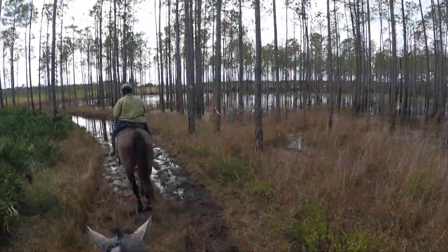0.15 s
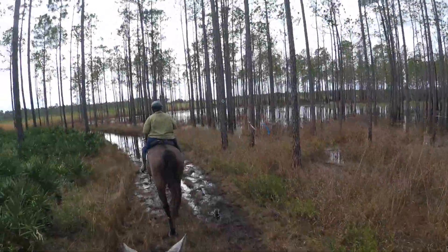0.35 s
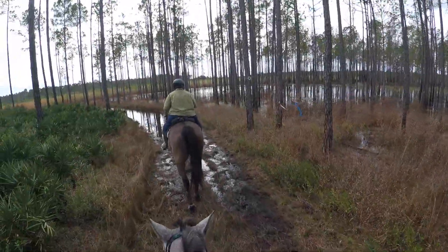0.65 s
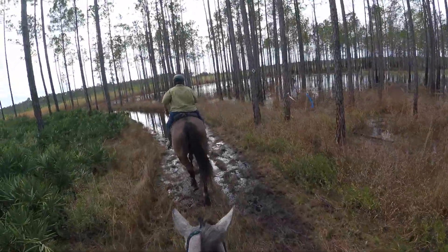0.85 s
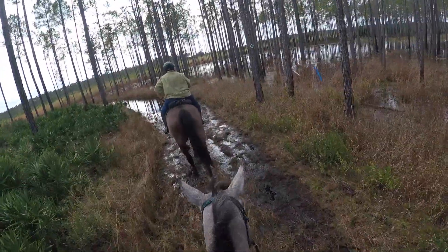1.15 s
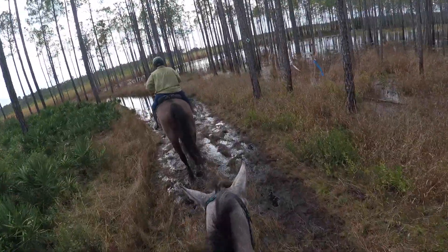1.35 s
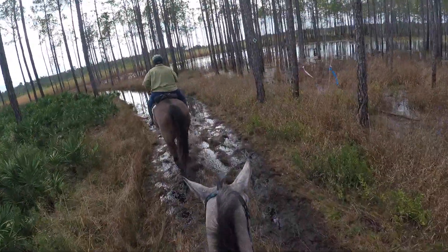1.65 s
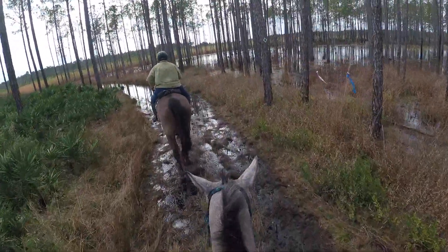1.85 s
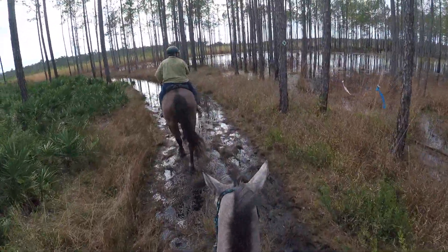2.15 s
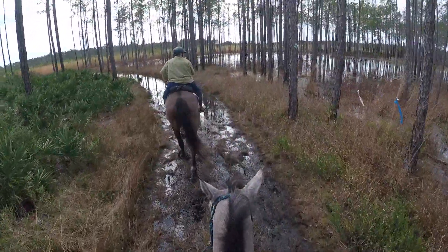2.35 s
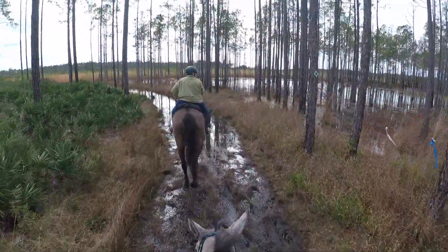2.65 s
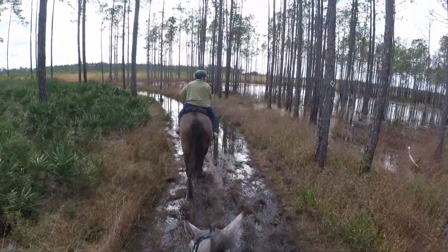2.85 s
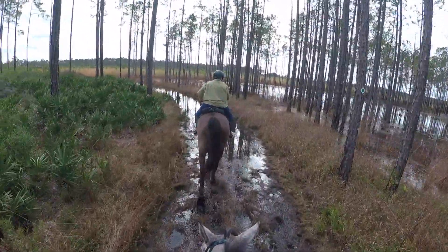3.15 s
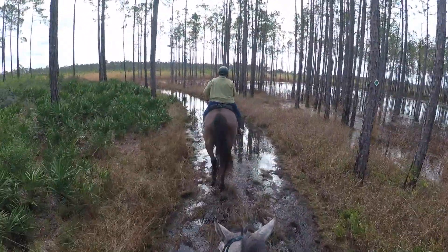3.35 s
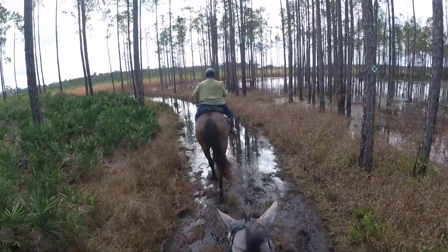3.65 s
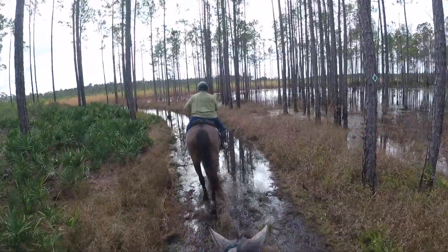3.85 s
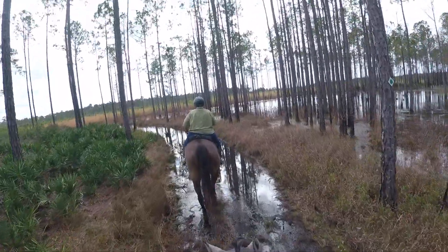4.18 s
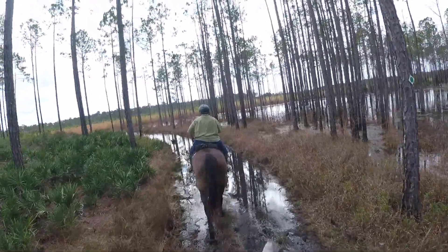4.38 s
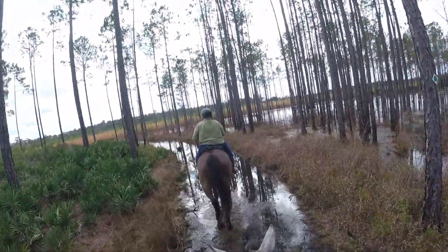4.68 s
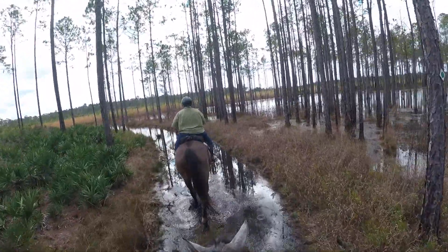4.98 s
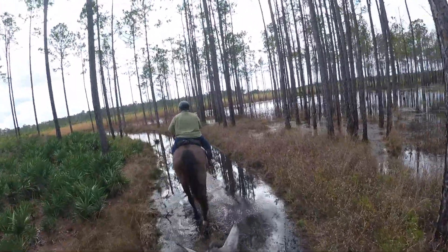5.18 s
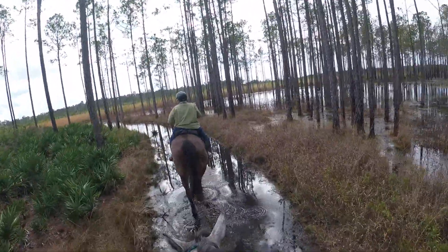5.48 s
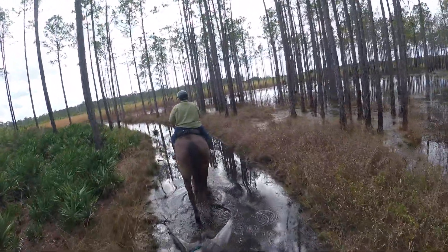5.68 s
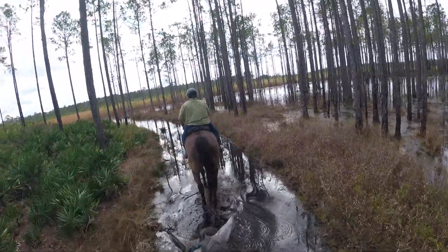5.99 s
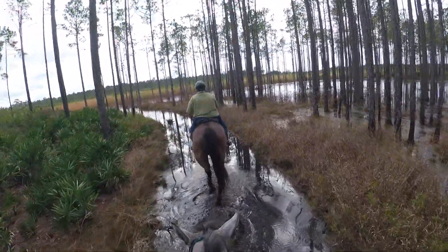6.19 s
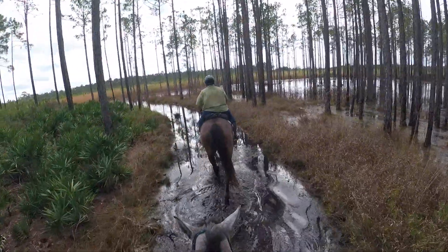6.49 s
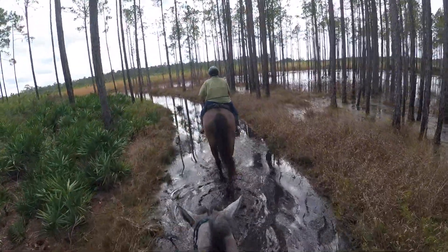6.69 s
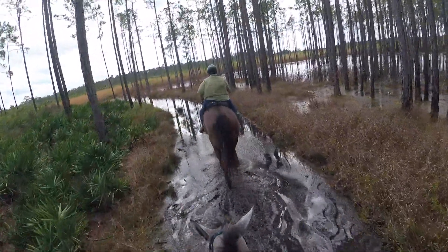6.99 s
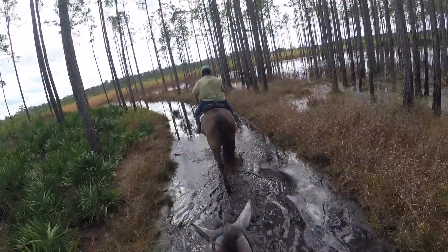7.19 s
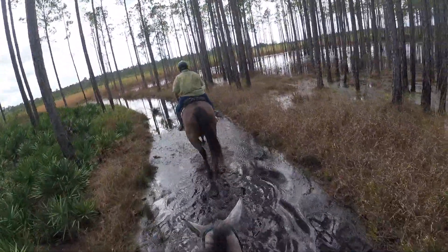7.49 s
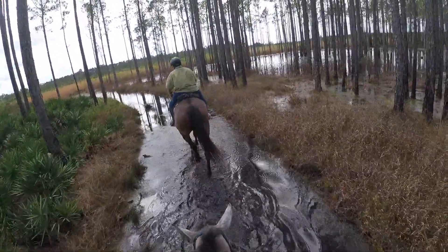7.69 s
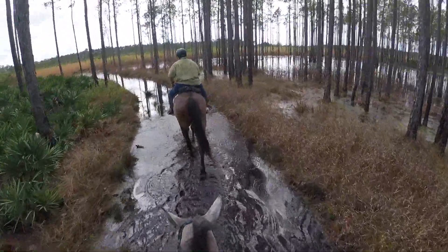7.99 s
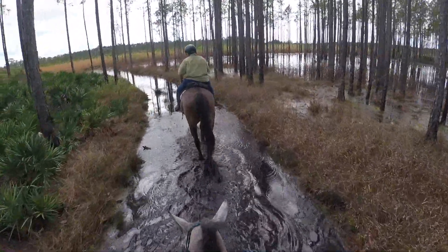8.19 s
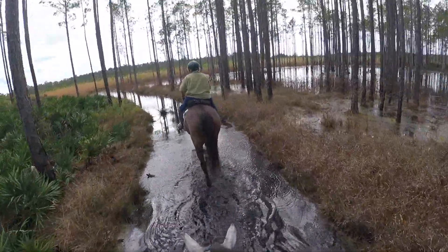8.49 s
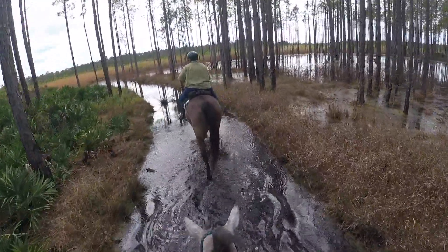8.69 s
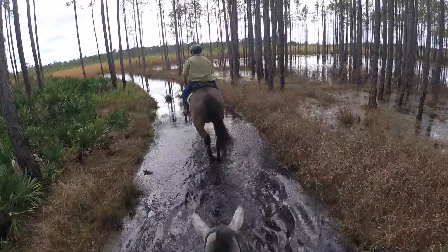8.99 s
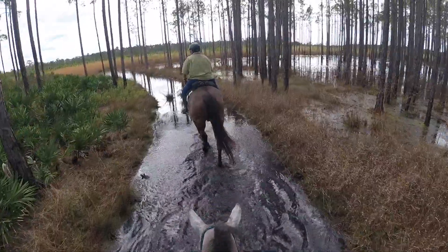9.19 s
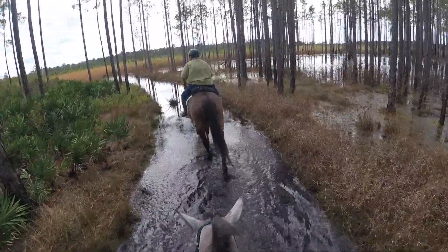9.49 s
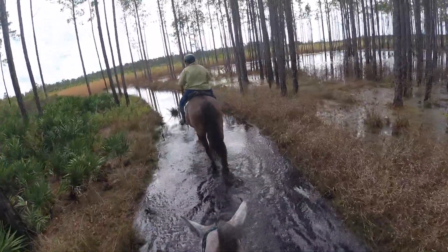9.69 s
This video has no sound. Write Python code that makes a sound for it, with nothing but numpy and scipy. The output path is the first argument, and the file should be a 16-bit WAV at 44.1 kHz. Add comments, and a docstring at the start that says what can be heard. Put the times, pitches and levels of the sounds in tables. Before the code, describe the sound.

Two horses walk along a muddy woodland trail, heard close from the second saddle. Wind rumbles and puffs against the microphone over faint hiss. Hooves slap and squelch irregularly in mud, with a hard knock early on. Around the middle the ground turns wetter: gurgling, hollow plops, spray and bright drops increase. Two more knocks come near the end.

```python
"""Two horses walk along a muddy forest trail that turns into shallow water, heard from the saddle of the second.
From the start wind (rumbling noise with single swings and puffs) buffets the microphone over a faint hiss.
Hooves slap (ragged noise bursts) and squelch (crowds of ringing bubbles on noise); air pockets plop as gliding tones.
At 2.6 s something hard knocks (a rattle in damped modes). From about 5 s the trail gets wetter: spray grows and
bright flicks of drops join in. Two more knocks come at 9.1 and 9.7 s."""
import sys
import numpy as np
from scipy import signal
from scipy.fft import rfft, irfft
from scipy.io import wavfile

SR = 44100
rng = np.random.default_rng(int(sys.argv[2]) if len(sys.argv) > 2 else 0)


def generate_wav(signal):
    """Clip the signal to [-1, 1] and save it as 16-bit WAV at the path in sys.argv[1]."""
    frames = np.transpose(np.atleast_2d(signal))
    scaled = np.clip(frames, -1, 1) * 32767
    pcm = np.round(scaled).astype(np.int16)
    wavfile.write(sys.argv[1], SR, pcm)


def decibels_to_gain(level_db):
    """Convert a level in decibels to a linear amplitude gain (20 dB per decade)."""
    exponent = np.asarray(level_db, float) / 20
    return 10 ** exponent


N = 433944   # length in samples


def rms_one(x):
    """Scale to an rms (average strength) of 1."""
    return x / np.sqrt(np.mean(x ** 2) + 1e-20)


def in_time(rows):
    """Turn rows of (seconds, values ..) into curves of straight lines, one value per sample."""
    s, *columns = np.transpose(rows)
    return [np.interp(np.arange(N) / SR, s, column) for column in columns]


def at_hz(points, hz):
    """Read a spectrum's level in dB at a frequency, along a logarithmic pitch axis."""
    table_hz, table_db = np.transpose(points)
    return np.interp(np.log(hz), np.log(table_hz), table_db)


def coloured(spectrum, low_hz, high_hz):
    """Noise shaped to a spectrum between two steep edges; rms 1."""
    hz = np.arange(N // 2 + 1) * SR / N + 1   # the 1 avoids the logarithm of zero
    edges = 1 / np.sqrt((1 + (low_hz / hz) ** 8) * (1 + (hz / high_hz) ** 8))
    white = rfft(rng.standard_normal(N))
    return rms_one(irfft(white * decibels_to_gain(at_hz(spectrum, hz)) * edges, N))


def drift(rate_hz):
    """Random wandering of rms 1: noise smoothed twice by a one-pole low-pass."""
    every = 40   # computed once in so many samples
    r = np.exp(-2 * np.pi * rate_hz * every / SR)
    noise = rng.standard_normal(N // every + 2002)
    slow = signal.lfilter([1], [1, -2 * r, r * r], noise)[2000:]   # skip the filter's start
    return np.interp(np.arange(N) / every, np.arange(len(slow)), rms_one(slow))


def add(out, s, sound):
    """Mix a short sound in at time s."""
    i = int(s * SR)
    out[i:i + len(sound)] += sound[:N - i]


def bursts(starts, t60s, rise_s):
    """Loudness outline of sudden sounds given as (s, dB); each falls 60 dB in its t60, kept to 0.01-0.3 s."""
    out, t = np.zeros(N), np.arange(SR // 4) / SR
    for (s, level_db), t60 in zip(starts, t60s):
        fall_db = -60 * t / np.clip(t60, .01, .3)
        add(out, s, (1 - np.exp(-t / rise_s)) * decibels_to_gain(level_db + fall_db))
    return out


def bubble(hz, cycles, rise, onset_cycles=0.1):
    """An air pocket rings; its pitch glides (octaves per s) and it fades 40 dB in so many of its own cycles."""
    t = np.arange(int(cycles / hz * SR)) / SR   # cut after as many cycles of the first pitch
    pitch = np.minimum(hz * 2 ** (rise * t), SR / 2.5)
    turns = np.cumsum(pitch) / SR
    return (1 - np.exp(-turns / onset_cycles)) * decibels_to_gain(-40 * turns / cycles) * np.sin(2 * np.pi * turns)


# Colour of the hiss. Each row: frequency in Hz, relative level in dB.
HISS_SPECTRUM = [(180, -4), (300, 1.5), (1020, -5.5), (1510, -14.5), (2130, -15), (3610, -19),
                 (4630, -27.5), (7590, -17.5), (12400, -27.5), (15400, -31.5)]


def hiss():
    """A faint steady noise, made by shaping white noise to a fixed spectrum."""
    return decibels_to_gain(-73.5) * coloured(HISS_SPECTRUM, 170, 16000)


# Strength of the wind on the microphone.
# Each row: time in seconds, deep buffeting in dB, small eddies relative to it in dB.
WIND_STRENGTH = [(0.0, -58, -7), (0.05, -44.5, -1.5), (1.29, -43.5, -0.5), (2.27, -54.5, -15),
                 (2.63, -43, -3.5), (2.82, -49.5, -12), (3.37, -43.5, -1.5), (3.51, -58.5, -8),
                 (3.94, -47, -2.5), (4.9, -50.5, -1.5), (5.12, -35.5, -5), (5.31, -49.5, -12.5),
                 (5.45, -43, -5.5), (5.84, -52.5, -8.5), (6.9, -50, -16.5), (6.99, -33.5, -15),
                 (7.04, -43.5, -9.5), (8.06, -40, -11.5), (8.44, -32, -8.5), (8.71, -39, -5.5),
                 (9.26, -36.5, -7.5), (9.29, -47.5, -6), (9.81, -34, -10.5), (9.84, -41, -15)]
# Single puffs of air. Each row: crest in seconds, level in dB, half width in seconds.
AIR_PUFFS = [(.13, -35.5, 0.019), (0.229, -41, 0.0041), (0.866, -45, 0.0088), (0.92, -39, 0.0037),
             (1.204, -38, 0.015), (1.363, -36, 0.013), (1.616, -44, 0.018), (3.626, -41.5, 0.0035),
             (6.412, -48, 0.0064), (6.97, -39.5, 0.0036), (7.34, -40.5, 0.0059), (7.94, -43.5, 0.0063),
             (8.375, -41.5, 0.0082), (8.428, -44, 0.0069)]
# Strong lumps in the buffeting. Each row: middle in seconds, relative level in dB, pitch in Hz.
WIND_LUMPS = [(0.116, -27.5, 80.6), (0.286, -24.5, 107), (0.348, -28, 106), (0.853, -25, 137),
              (0.918, -24, 113), (1.213, -32, 168), (1.247, -28, 121), (1.275, -29, 113),
              (1.625, -31.5, 166), (2.538, -32, 87), (5.009, -29, 100), (5.113, -24, 102), (6.99, -28, 81),
              (7.05, -30, 65), (7.261, -26, 83), (7.348, -25.5, 76), (7.938, -27, 104), (8.094, -27.5, 104),
              (8.374, -26, 89), (8.426, -26, 78), (8.52, -26, 70.5), (9.166, -29, 109), (9.203, -27.5, 92),
              (9.472, -29, 89), (9.624, -28, 93)]
# Colour of the turbulence. Each row: frequency in Hz, relative level per Hz in dB.
EDDY_SPECTRUM = [(11, -43), (18, -2), (48, 1), (89, -3), (154, -10.5), (420, -34), (550, -52), (920, -120)]


def wind():
    """Turbulence at the microphone comes in lumps; small eddies are higher and more fitful; some hit as puffs."""
    lump_cycles = 0.33   # half width of a lump: about one swing of pressure
    deep_db, small_db = in_time(WIND_STRENGTH)
    shared = drift(10.9)   # both sizes of eddy follow it
    deep = coloured(EDDY_SPECTRUM, 27, 100.5) * decibels_to_gain(3.34 * shared + 1.2 * drift(14.0))
    small = coloured(EDDY_SPECTRUM, 103.7, 287) * decibels_to_gain(2.36 * shared + 2.63 * drift(24))
    buffeting = decibels_to_gain(deep_db) * (rms_one(deep) + decibels_to_gain(small_db) * rms_one(small))
    puffs, lumps, t = np.zeros(N), np.zeros(N), np.arange(-SR // 20, SR // 20) / SR
    for s, level_db, width_s in AIR_PUFFS:
        add(puffs, s + t[0], decibels_to_gain(level_db) * np.exp(-(t / width_s) ** 2))
    for s, level_db, hz in WIND_LUMPS:
        outline = np.exp(-(t * hz / lump_cycles) ** 2 / 2)
        add(lumps, s + t[0], decibels_to_gain(level_db - 1.5) * outline * np.sin(2 * np.pi * hz * t))
    return buffeting + lumps + puffs * coloured(EDDY_SPECTRUM, 222, 600)


# Hard knocks, as of hoof on hoof or tack. Each row: start in seconds, peak in dB, rattle length in seconds,
# brightness in dB per octave above 2000 Hz, pitch of the main ring in Hz.
HARD_KNOCKS = [(2.603, -37, 0.0067, 1, 1620), (9.0856, -33, 0.011, 0.5, 1803),
               (9.7095, -31, 0.0089, -2, 1934)]
# What else rings in a knock. Each row: pitch in Hz, level in dB, time to fall 60 dB in seconds.
KNOCK_MODES = [(970, -6, .012), (1450, -3, .010), (2150, -5, .006), (2750, -8, .006), (3700, -10, .004),
               (5050, -5, .006), (7000, -12, .004)]


def knocks():
    """A rattle of a few ms strikes the heavily damped modes of a hard body; each gets its share of the blow."""
    main_ring_db = 1
    out, t = np.zeros(N), np.arange(SR // 10) / SR
    soft_contact = signal.butter(4, 7500, fs=SR, output="sos")   # takes off the highest treble
    for s, peak_db, rattle_s, bright_db, ring_hz in HARD_KNOCKS:
        outline = np.exp(-(t / rattle_s) ** 2)
        rattle = signal.sosfilt(soft_contact, rng.standard_normal(len(t))) * outline
        # the main ring lasts as long as the rattle
        main_ring = t / (t + .002) * outline * np.sin(2 * np.pi * ring_hz * t)
        knock = decibels_to_gain(main_ring_db) * rms_one(main_ring)
        for hz, level_db, t60 in KNOCK_MODES:
            ring = decibels_to_gain(-60 * t / t60) * np.sin(2 * np.pi * hz * t)
            mode = rms_one(signal.fftconvolve(rattle, ring)[:len(t)])
            knock = knock + decibels_to_gain(level_db + bright_db * max(np.log2(hz / 2000), 0)) * mode
        add(out, s, decibels_to_gain(peak_db) * knock / np.abs(knock).max())
    return out


# Bright flicks of thrown drops. Each row: start in seconds, level in dB.
DROP_FLICKS = [(5.704, -51.5), (6.6942, -53), (6.8305, -49.5), (7.418, -54), (7.4954, -52.5), (8.5041, -49),
               (9.3265, -45.5), (9.5203, -51.5)]


def flicks():
    """A handful of drops lands at once: a short bright tick of noise."""
    t60_s = 0.021
    return bursts(DROP_FLICKS, [t60_s] * len(DROP_FLICKS), 0.00091) * coloured(SPLASH_SPECTRUM, 4250, 11000)


def patter(stir_db):
    """Lumps of mud and water fall back: random dull heavy and crisp light ticks, stronger in stirred water."""
    per_s, level_db, t60_s = 70, 2.5, 0.026   # ticks of both kinds; level over the squelch; fall of a heavy one
    when, size = rng.random((int(per_s * N / SR), 2)).T
    starts = list(zip(when * (N - 1) / SR, -3.5 * np.log(1.01 - size)))   # a few ticks are much stronger
    heavy = bursts(starts[::2], [t60_s] * len(when), 0.00086) * coloured(SPLASH_SPECTRUM, 500, 1500)
    light = bursts(starts[1::2], [t60_s / 2] * len(when), 0.00091) * coloured(SMACK_SPECTRUM, 1100, 3900)
    return decibels_to_gain(stir_db + level_db) * (heavy + light)


# Colour of splashing water. Each row: frequency in Hz, relative level in dB.
SPLASH_SPECTRUM = [(240, 3), (534, -3.5), (964, -1), (1140, -4.5), (1970, -10.5), (2430, -12), (3700, -17),
                   (4700, -21), (6200, -24), (7000, -34.5), (8960, -42.5), (10700, -38), (11900, -57),
                   (15000, -60)]


def swarm(count, low_hz, high_hz, cycles, climb, spread_db):
    """Many bubbles at random moments, of random pitch, unequal level and ring; rms 1. climb: octaves in cycles."""
    out = np.zeros(N)
    for when, pitch, size, life in rng.random((count, 4)):
        hz = low_hz * (high_hz / low_hz) ** pitch
        size_db = -spread_db * np.log(1.015 - size)
        # higher bubbles are shorter, so the square root of pitch makes up for their length
        gain = decibels_to_gain(at_hz(SPLASH_SPECTRUM, hz) + size_db) * np.sqrt(hz)
        add(out, when * (N - 1) / SR, gain * bubble(hz, cycles * (0.79 + life), climb * hz / cycles))
    return rms_one(out)


def water(stir_db, low_hz, high_hz, count, cycles, climb, bubbles_db, wash_db, flicker_db, flicker_rate):
    """One size class of stirred water: a crowd of bubbles on a ragged wash of noise."""
    bubbles = swarm(count, low_hz, high_hz, cycles, climb, spread_db=1.0)
    wash = coloured(SPLASH_SPECTRUM, low_hz, high_hz) * decibels_to_gain(flicker_db * drift(flicker_rate))
    return decibels_to_gain(stir_db) * (decibels_to_gain(bubbles_db) * bubbles + decibels_to_gain(wash_db) * rms_one(wash))


# A leg dragged through mud or water. Each row: crest in seconds, squelch in dB, gurgle relative to it in dB,
# extra spray in dB, length in seconds (half the time from start to end, before any lingering).
LEG_STRIDES = [(0.26, -71, 3, 5, 0.3), (0.527, -60, -4, 3, 0.091), (0.847, -72.5, 10.5, 6, 0.11),
               (0.955, -66, 3, -12, 0.067), (1.116, -60.5, 0, 2, 0.11), (1.201, -65.5, 2.5, 0, 0.091),
               (1.303, -66, -12, -7, 0.052), (1.432, -66.5, -4, 5, 0.2), (1.571, -61.5, 5, -2, 0.029),
               (1.623, -67.5, 13.5, 0, 0.032), (1.775, -67, 0, -4, 0.31), (2.013, -70.5, -13, 0, 0.23),
               (2.33, -63.5, -16, 3, 0.15), (2.403, -70.5, 4, -1, 0.44), (2.705, -61.5, -2, -5, 0.09),
               (2.834, -67, -4, -6, 0.049), (3.027, -56, -3, -1, 0.087), (3.15, -74, -11, 1, 0.2),
               (3.333, -73.5, 1, -1, 0.47), (3.52, -70, -13, 0, 0.078), (3.696, -58.5, -2.5, -6, 0.14),
               (3.916, -68, 6, 6.5, 0.094), (4.041, -67, 3, -7, 0.1), (4.2, -64, -4, -0.5, 0.27),
               (4.398, -60.5, 5.5, -10, .1), (4.494, -61.5, 8.5, 1, 0.082), (4.586, -65, 8, 8, 0.038),
               (4.781, -61.5, 0, 6.5, 0.22), (5.008, -61.5, 13, 2, 0.13), (5.096, -67, 13, -10, 0.074),
               (5.21, -69.5, 5, 0, 0.25), (5.29, -85, 13, 17, 0.088), (5.395, -59.5, 2.5, 1.5, 0.12),
               (5.644, -70, 11, 2, 0.21), (5.746, -57, 7, 6.5, 0.097), (5.981, -63.5, 6, 5, 0.22),
               (6.074, -61.5, 2.5, 4, 0.15), (6.443, -58, 5, 10, 0.2), (6.671, -63.5, 4, 16, 0.16),
               (6.786, -58.5, -0.5, 5.5, 0.22), (6.978, -66, 7, 4, 0.074), (7.161, -61, 12, -14, 0.15),
               (7.416, -62, 2.5, -2, 0.35), (7.546, -66, 4, -2, 0.12), (7.719, -61.5, 8.5, 1.5, 0.067),
               (7.847, -58, 4, -1, 0.13), (8.064, -57.5, 1, -18, 0.1), (8.14, -66, -9, -2, 0.34),
               (8.257, -63, 4.5, -3, 0.42), (8.383, -65.5, 9, 6.5, 0.17), (8.572, -57, 4, -0.5, 0.19),
               (8.747, -57.5, 4, -8, 0.14), (9.006, -62, 9.5, -13, 0.19), (9.13, -76, 7, 6, 0.12),
               (9.318, -58.5, -4, -10, 0.14), (9.399, -60, 13, -14, 0.11), (9.532, -61, 2.5, -2, 0.11),
               (9.68, -65, -10, 1.5, 0.3), (9.744, -65.5, 9.5, 5, 0.11)]


def stirring(crest_db, lingers, between_db):
    """Level in dB: every stride swells to its crest and sinks back into the slosh left between strides."""
    drop_db, rise_share = -24.5, 0.47   # level at start and end against the crest; share of the time spent rising
    t, power = np.arange(0, N + 64, 64) / SR, 0
    for (s, *_, length_s), top_db in zip(LEG_STRIDES, crest_db):
        before = (s - t) / rise_share
        after = (t - s) / ((1 - rise_share) * lingers)   # lingers stretches the sinking
        away = np.maximum(before, after) / (2 * length_s)
        power = power + decibels_to_gain(top_db + drop_db * away) ** 2
    return 10 * np.log10(np.interp(np.arange(N) / SR, t, power) + decibels_to_gain(between_db) ** 2)


def spray(slosh_db, spray_db):
    """Thrown drops: tiny high bubbles in a strong bright wash that sinks faster than the squelch."""
    _, push_db, _, drops_db, _ = np.transpose(LEG_STRIDES)
    stir_db = stirring(push_db + drops_db, 0.73, slosh_db + 4.5) + spray_db
    return water(stir_db, 4360, 15000, count=5000, cycles=5.4, climb=0.38,
                 bubbles_db=-7.0, wash_db=0.0, flicker_db=2.5, flicker_rate=86)


def gurgle(slosh_db):
    """Churned-up air: large low bubbles that linger after the push."""
    _, push_db, air_db, _, _ = np.transpose(LEG_STRIDES)
    stir_db = stirring(push_db + air_db, 1.09, slosh_db + 5.5)
    return water(stir_db, 288.0, 1363, count=1100, cycles=12, climb=0.4,
                 bubbles_db=-4, wash_db=-7.5, flicker_db=2.5, flicker_rate=30)


def squelch(stir_db):
    """Mud pressed by the leg: middle-sized bubbles over a softer wash."""
    return water(stir_db, 1480, 3590, count=2200, cycles=18.2, climb=0.41,
                 bubbles_db=-3, wash_db=-7.5, flicker_db=2.2, flicker_rate=45)


# Large trapped air pockets. Each row: start in seconds, strength in dB, pitch in Hz, rise in octaves per second.
AIR_POCKETS = [(1.414, -46, 1030, 11), (2.372, -42.5, 960, 6), (2.384, -46, 1080, 4),
               (2.394, -48, 1080, -4), (4.006, -53, 980, 2), (4.127, -45.5, 945, 8), (4.169, -42, 2700, 1),
               (4.278, -53, 371, 28.5), (4.403, -39.5, 1040, 4), (4.51, -40.5, 675, -3),
               (4.799, -37.5, 447, 12), (4.909, -36.5, 860, 2), (5.009, -35, 590, 17), (5.077, -53, 690, 2),
               (5.212, -49, 940, 1), (5.226, -47, 950, -1), (5.245, -44.5, 290, 4), (5.268, -43, 523, 6),
               (5.288, -42, 570, 5), (5.746, -47, 920, 3), (5.772, -45, 900, -6), (5.905, -49, 200, 19),
               (5.958, -43, 360, 2), (5.978, -42, 563, 10), (6.074, -45, 424, 10), (6.135, -49, 508, 19),
               (6.335, -51.5, 241, 19.5), (6.466, -42, 865, 9), (6.515, -49, 382, -14),
               (6.676, -44, 463, 8), (6.814, -41, 823, 2), (7.062, -46, 390, 12), (7.095, -40, 944, 6),
               (7.139, -38, 396, 13), (7.162, -45, 915, 1), (7.193, -46, 1000, -18), (7.339, -46, 370, 20),
               (7.572, -37.5, 450, 9), (7.862, -43, 1020, 4), (7.884, -44, 950, 6), (8.056, -42, 520, 1),
               (8.377, -39.5, 713, 11), (8.598, -47, 354, 7), (8.447, -44, 830, 6), (8.582, -41, 860, 1),
               (8.6, -39.5, 910, 2), (8.722, -33, 946, 8), (8.724, -32, 558, 7), (8.885, -46, 326, 25),
               (8.93, -39, 332, 28.5), (9.045, -36.5, 526, 8.4), (9.389, -35, 856, 4),
               (9.503, -53, 1490, 2), (9.62, -48, 1510, 3), (9.676, -46, 1270, -3), (9.75, -37, 606, 11)]


def plops():
    """Large air pockets ring under the surface; smaller ones ring for more cycles."""
    out = np.zeros(N)
    for s, level_db, hz, rise in AIR_POCKETS:
        cycles = max(12.2 + 4.6 * np.log2(hz / 500), 5)
        if rise > 17:   # fast-rising pockets are fed with air and ring on
            cycles = 55
        add(out, s, decibels_to_gain(level_db) * bubble(hz, cycles, rise, onset_cycles=cycles / 12))
    return out


# Hoof pulling out of mud. Each row: start in seconds, level in dB, starting pitch in Hz.
MUD_SUCKS = [(2.492, -48, 1450), (3.495, -47, 1550)]


def sucks():
    """A cavity opens as a hoof leaves the mud: a very short tone whose pitch sinks towards half."""
    sink_s, ends_at = .0045, .5
    out, t = np.zeros(N), np.arange(SR // 20) / SR
    outline = t / (t + .001) * np.exp(-(t / (2 * sink_s)) ** 2)
    for s, level_db, hz in MUD_SUCKS:
        pitch = hz * (ends_at + (1 - ends_at) * np.exp(-t / sink_s))
        add(out, s, decibels_to_gain(level_db) * outline * np.sin(2 * np.pi * np.cumsum(pitch) / SR))
    return out


# Hoof or thrown water meeting the surface. Each row: start in seconds, strength in dB, fullness (lows) in dB,
# brightness (treble) in dB, time to fall 60 dB in seconds; fullness and brightness are relative to the strength.
SURFACE_SLAPS = [(0.2238, -51.5, 11, -13, 0.027), (0.307, -53, -21, -16.5, 0.15),
                 (0.482, -53, -8, -9, 0.055), (0.827, -45.5, 10, -14, 0.033), (1.07, -46.5, -5.5, -18, 0.1),
                 (1.1143, -57, -3, -30, 0.06), (1.41, -49.5, -17, -11.5, 0.034),
                 (1.6698, -50, -6.5, -17, 0.23), (1.695, -42, -6, -18, 0.14),
                 (1.833, -44, -22, -15.5, 0.077), (1.9126, -49.5, -4, -13, 0.065),
                 (2.0542, -52.5, -4, -18, 0.16), (2.193, -49, -23, -18, 0.09),
                 (2.3373, -39, -5, -19.5, 0.064), (2.374, -56, -3, -29, 0.16),
                 (2.4908, -43, -23, -28, 0.079), (3.153, -48, -26, -15.5, 0.058),
                 (3.358, -51, -4, -16.5, 0.15), (3.4957, -47.5, -13, -15, 0.048),
                 (3.6217, -48.5, -3.5, -10, 0.19), (3.8234, -47, -2, -11, 0.054),
                 (3.8802, -62.5, 19.5, -8, 0.034), (4.1686, -51, -2, -18, 0.14),
                 (4.2828, -52, 12.5, -20, 0.034), (4.336, -49.5, 4, -15, 0.095),
                 (4.367, -42.5, -16, -11.5, 0.065), (4.4723, -59, 4, -20, 0.075),
                 (4.6939, -45.5, 1, -17, 0.043), (4.722, -48, -9, -28, 0.031),
                 (4.802, -45.5, 2.5, -41, 0.055), (4.898, -53, 17.5, -35, 0.023),
                 (5.007, -50, -2, -12.5, 0.18), (5.0756, -53, 18, -26, 0.053),
                 (5.191, -44.5, -15, -15, 0.053), (5.66, -46, -7, -15, 0.038),
                 (5.742, -38, -29, -10.5, 0.03), (6.3644, -48, -6, -12, 0.018),
                 (6.4485, -38.5, -18, -8.5, 0.039), (6.814, -53, 1.5, -17, 0.29),
                 (7.088, -48, -13, -12, 0.24), (7.1389, -42.5, -12, -5.5, 0.042),
                 (7.3816, -43, -15, -20, 0.041), (7.569, -50, 13.5, -20, 0.03),
                 (7.8457, -39.5, -9, -9, 0.029), (8.0557, -57, -3, -20, 0.1), (8.382, -56, 13, -12, 0.067),
                 (8.5203, -47.5, -15, -12, 0.081), (8.692, -41, -3, -6, 0.029),
                 (8.7235, -53.5, 16, -24, 0.072), (8.8753, -48.5, -10, -25, 0.043),
                 (9.359, -39.5, 4, -25, 0.055)]
# Colour of a slap. Each row: frequency in Hz, relative level per Hz in dB.
SMACK_SPECTRUM = [(240, -49), (400, 6.5), (1250, -7), (1910, -5), (2470, -8.5), (3190, -7.5), (4260, -7.5),
                  (4880, -8.5), (6130, -14), (7810, -21), (15000, -46)]


def slaps():
    """Each contact is a sudden ragged burst of noise in three bands; the treble starts fastest."""
    s, level_db, full_db, bright_db, t60 = np.transpose(SURFACE_SLAPS)
    low = bursts(zip(s, level_db + full_db - 3.5), 0.77 * t60, 0.0013) * coloured(SMACK_SPECTRUM, 546, 1150)
    body = bursts(zip(s, level_db - 7.5), t60, 0.0011) * coloured(SMACK_SPECTRUM, 950, 3020)
    edge_outline = bursts(zip(s, level_db + bright_db - 5.5), 1.12 * t60, 0.00059)
    edge = edge_outline * coloured(SMACK_SPECTRUM, 4500, 16000)
    ragged = decibels_to_gain(2.2 * drift(120))   # mud and water tear into separate grains
    return low + ragged * (body + edge)


def ground_echo(x):
    """Add one dull reflection from water and horse, 13 ms late."""
    dull = signal.lfilter([.4], [1, -.6], x)
    out = x.copy()
    add(out, .013, decibels_to_gain(-11.5) * dull)
    return out


# How wet the trail is. Each row: time in seconds, slosh left between strides in dB, level added to the spray in dB.
TRAIL_WETNESS = [(0, -94, -20), (.7, -84, -15), (1.5, -80.5, -18), (2.9, -84, -11.5), (3.8, -85, -13.5),
                 (4.5, -75, -14.5), (4.9, -86, -25), (5.1, -83, -7.5), (5.5, -80, -12), (6.2, -73, -10),
                 (6.6, -78, -19.5), (7.0, -70, -6.5), (8.0, -73, -6.5), (9.0, -66.5, -8.5),
                 (9.35, -68.5, -4), (9.47, -75.5, -10), (9.6, -69, -6), (9.84, -66, -13.5)]


def scene():
    """Hiss and wind at the microphone, water and mud below."""
    slosh_db, spray_db = in_time(TRAIL_WETNESS)
    push_db = np.transpose(LEG_STRIDES)[1]
    stir_db = stirring(push_db, 0.84, slosh_db)
    air = hiss() + wind()
    drops = flicks() + patter(stir_db) + spray(slosh_db, spray_db)
    mud = gurgle(slosh_db) + squelch(stir_db)
    hooves = ground_echo(plops() + sucks() + slaps())
    return (air + knocks() + drops + mud + hooves)[None]   # one channel


def roll_off(x):
    """The treble ends steeply here."""
    return signal.sosfilt(signal.butter(12, 15100, fs=SR, output="sos"), x)


def record(dry):
    """Put the finished mix through the last processing step."""
    return roll_off(dry)


dry = scene()
out = record(dry)
generate_wav(out)
```